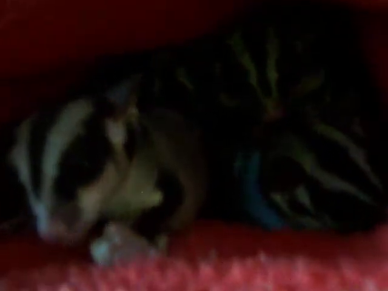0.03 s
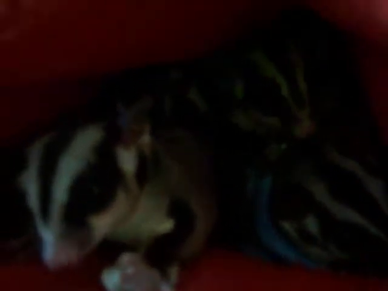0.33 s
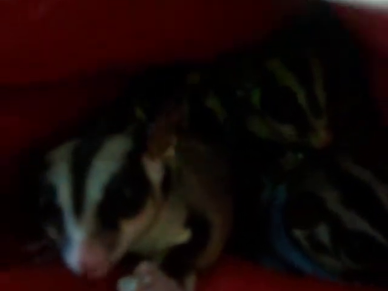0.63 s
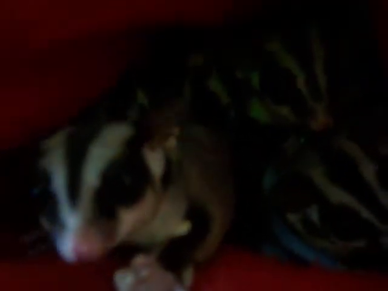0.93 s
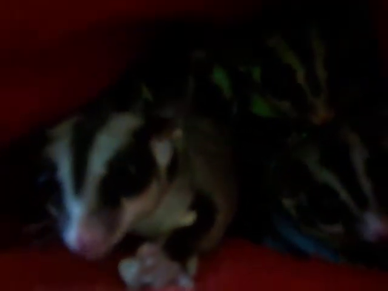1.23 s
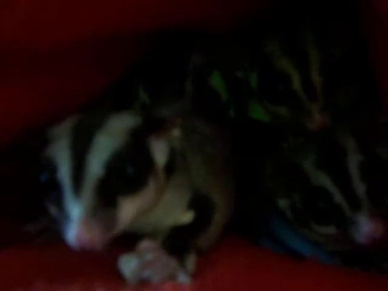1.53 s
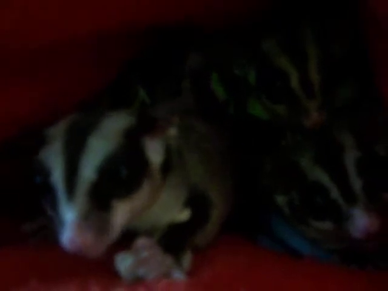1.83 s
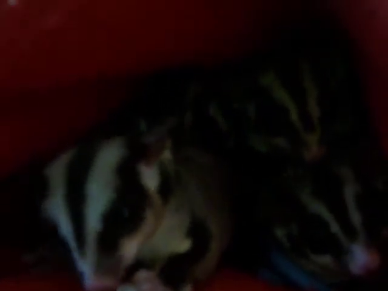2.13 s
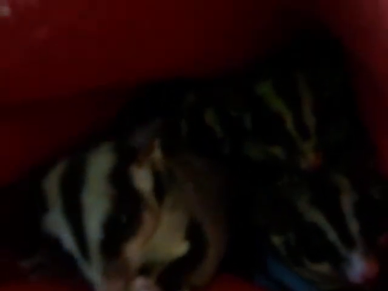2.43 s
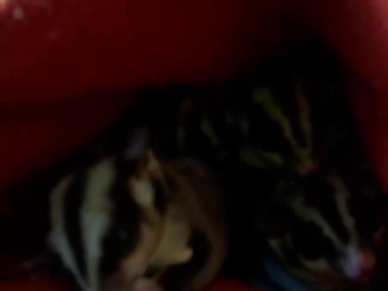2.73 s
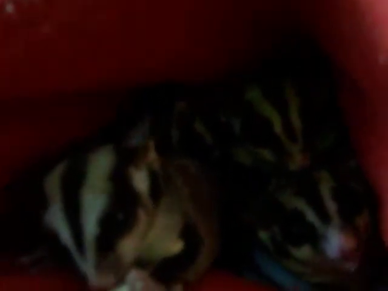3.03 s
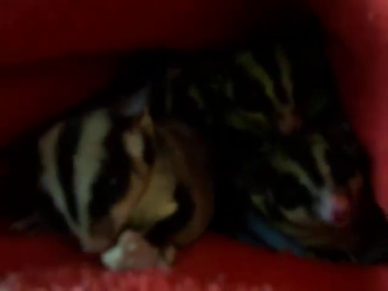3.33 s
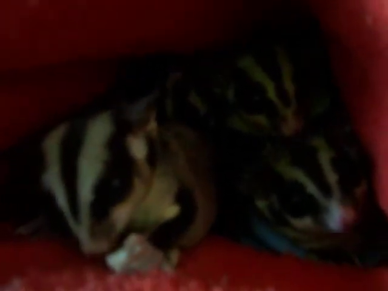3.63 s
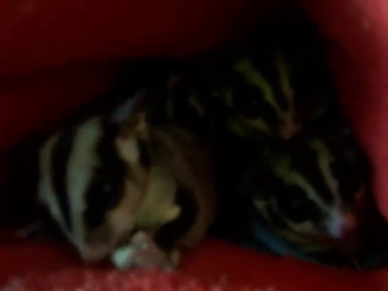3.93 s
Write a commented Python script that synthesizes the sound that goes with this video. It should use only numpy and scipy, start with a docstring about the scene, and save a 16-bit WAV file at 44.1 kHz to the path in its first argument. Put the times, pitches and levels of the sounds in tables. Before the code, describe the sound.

Small animals nibble treats quietly, close up in a cloth pouch. Four tiny crisp bites come in the first second, then others near 2.6, 3.3 and 3.7 seconds, with wet lip ticks scattered throughout. The cloth softly bumps the microphone around 0.4, 2.1, 3 and 3.9 seconds. Underneath run steady room hiss, a rapid low electronic flutter, a faint hum and a thin high whine.

```python
"""Small animals crunch treats in a cloth pouch, close to a camera: a few crisp bites, many wet lip ticks.
Each bite is a cluster of snaps, heard dry and ringing through the mouth; each tick is one ringing snap.
Now and then the cloth nudges the camera with a soft bump. Underneath sit the camera's electronics,
a low flutter at its frame rate and a thin whine with faint hum, on a bed of steady room hiss."""
import sys
import numpy as np
from scipy import signal
from scipy.fft import rfft, irfft, next_fast_len
from scipy.io import wavfile

SR = 44100
rng = np.random.default_rng(int(sys.argv[2]) if len(sys.argv) > 2 else 0)


def materialize(psi):
    """Save the field psi as 16-bit PCM at rate SR to the path in sys.argv[1].

    A 1-D psi becomes a single channel; in a 2-D psi each row is a channel.
    """
    bounded = np.clip(np.atleast_2d(psi).T, -1, 1)
    quanta = np.round(bounded * 32767).astype(np.int16)
    wavfile.write(sys.argv[1], SR, quanta)


N = 176400

# Treats cracking. Each row: main snap time, crackle span before it and after it, all in seconds,
# dry crack level in dB, then four mouth resonances, each as pitch in Hz and level in dB.
TREAT_BITES = [ (0.1261, 0.0011, .0045, -52, 2070, -47, 3340, -45.5, 6100, -46, 7930, -43),
               (0.1971, 0.00085, 0.0011, -47, 2370, -43, 3600, -60, 6400, -54, 7800, -51),
               (0.4213, 0.00058, 0.0029, -48.5, 2950, -45, 3800, -47, 4660, -46.5, 5900, -52),
               (.9536, .0005, 0.0018, -44.5, 1760, -46, 3930, -49.5, 5800, -51, 7240, -48.5),
               (2.6349, 0.00012, 0.00057, -48, 1860, -48, 3520, -49.5, 5800, -48, 6900, -51),
               (3.2967, 0.0007, 0.003, -52.5, 2110, -46.5, 3700, -46, 5350, -45, 5940, -47.5),
               (3.7489, 0.0029, 0.0013, -58, 2920, -49, 4150, -49.5, 5500, -45.5, 6060, -50)]
# Lip and tongue ticks. Each row: start in seconds, level in dB, pitch in Hz, nominal ring in seconds.
LIP_TICKS = [ (.035, -75, 5000, .003), (0.053, -52, 4800, 0.0014), (0.418, -52, 7900, 0.0023),
             (0.685, -57, 2800, .004), (.690, -60, 5200, .003), (.994, -50.5, 4600, 0.0013),
             (1.092, -49, 7600, 0.002), (1.183, -55, 2500, 0.0029), (1.251, -55.5, 5000, 0.0031),
             (1.308, -52, 600, 0.0076), (1.460, -48, 790, 0.0047), (1.712, -51, 2350, 0.0043),
             (1.879, -53, 6540, 0.00083), (2.1352, -49.5, 7400, 0.0017), (2.1773, -48.5, 7850, 0.0041),
             (2.383, -63, 3300, 0.0045), (2.651, -58, 5000, .003), (2.925, -53, 950, 0.0053),
             (3.307, -57, 5200, .003), (3.404, -60, 5500, .003), (3.5305, -51, 7200, 0.0013),
             (3.723, -54, 5200, 0.0034), (3.890, -51.5, 5700, 0.0027)]
# The pouch bumping the camera. Each row: time in seconds, peak level in dB.
POUCH_BUMPS = [(0.413, -36.5), (2.112, -32.5), (3.010, -33), (3.945, -38)]
# Fader ride on the flutter's low pulses. Each row: time in seconds, gain in dB.
FLUTTER_RIDE = [(0, 1.5), (.3, 1), (.42, 7), (.53, -4.5), (.67, 2.5), (.95, 1), (1.3, 2), (1.45, 1),
                (1.58, -0.5), (1.7, -0.5), (1.92, 2), (2.1, 1.5), (2.22, -1.5), (2.42, 1.5), (2.52, 2.5),
                (2.82, -1), (3.03, 1.5), (3.3, -0.5), (3.7, -1), (3.95, 4.5)]
# Mains hum and weak electronic tones. Each row: pitch in Hz, level in dB.
FAINT_TONES = [(120, -60), (180, -64), (240, -65.5), (1992.8, -79), (6543, -86)]
# Tone of the room and microphone hiss. Each row: frequency in Hz, relative level in dB.
HISS_EQ = [(20, 3), (60, 3.5), (130, 3.5), (220, -3), (300, -4), (450, -6.5), (800, -12), (1400, -16),
           (2100, -18), (3200, -19.5), (5500, -20.5), (7500, -21)]
# The camera's treble roll-off. Each row: frequency in Hz, gain in dB.
CAMERA_EQ = [(7300, -1), (7800, -6.5), (8400, -15), (8750, -25.5), (9050, -32)]


def bites(after_snaps=4, crackle_gain=0.53, low_cut_hz=910, mouth_width_hz=866):
    """A treat cracks: one main snap amid smaller ones, heard dry and through the mouth's resonances."""
    out = np.zeros(N)
    for at, before, after, crack_db, *mouth in TREAT_BITES:
        trailing = before + after * (np.arange(after_snaps) + rng.random(after_snaps)) / after_snaps
        offsets = np.r_[0, before, trailing]
        sizes = crackle_gain * rng.uniform(0.92, 1.3, len(offsets)) * rng.choice([-1, 1], len(offsets))
        sizes[1] = 1  # the main snap
        one_snap = snap()
        impulses = np.bincount((offsets * SR).astype(int), sizes, len(one_snap))
        crunch = signal.fftconvolve(impulses, one_snap)
        crack = level_click(filtered(crunch, lambda f: 1j * f / (low_cut_hz + 1j * f)))
        add(out, at - before, amp(crack_db) * crack)
        for hz, db in zip(mouth[::2], mouth[1::2]):
            add(out, at - before, -amp(db) * mouth_ring(crunch, hz, mouth_width_hz))
    return out


def lip_ticks(nibbles=30, nibble_db=(-64.5, -59), nibble_hz=4260, nibble_ring_s=0.002):
    """Lips and tongue make single wet ticks, with fainter chewing scattered between them."""
    out = np.zeros(N)
    chewing = [(rng.uniform(0, N / SR), rng.uniform(*nibble_db),
                nibble_hz * np.exp(0.39 * rng.normal()), nibble_ring_s) for _ in range(nibbles)]
    for start, db, hz, ring_s in LIP_TICKS + chewing:
        width_hz = 2 * np.log(1000) / (np.pi * ring_s)
        add(out, start, amp(db) * mouth_ring(snap(), hz, width_hz))
    return out


def mouth_ring(x, hz, width_hz):
    """The mouth rings at one pitch: two band-passes in series, each width_hz wide, then levelled."""
    return level_click(filtered(x, lambda f: (1j * f * width_hz / (hz**2 - f**2 + 1j * f * width_hz))**2))


def snap(samples=1764, pouch_db=-11, t60_s=0.036, rise_s=0.0025):
    """One sharp snap, followed by the pouch's short diffuse tail."""
    t = np.arange(samples) / SR
    tail = rng.standard_normal(samples) * amp(-60 * t / t60_s) * (1 - np.exp(-t / rise_s))
    return (t == 0) + amp(pouch_db) * tail / np.linalg.norm(tail)


def pouch_bumps(half_width_s=0.0025):
    """The cloth nudges the camera: one soft, low push each time."""
    t = np.arange(N) / SR
    return sum(amp(db) * np.exp(-0.5 * ((t - at) / half_width_s) ** 2) for at, db in POUCH_BUMPS)


def camera_flutter(frame_hz=30.014):
    """Each camera frame leaks into the sound as a short blip and a soft low pulse."""
    t = np.arange(N) / SR
    ride_db = np.interp(t, *np.transpose(FLUTTER_RIDE))
    return amp(-39) * frame_blips(t, frame_hz) + amp(-36 + ride_db) * frame_pulses(frame_hz)


def frame_blips(t, frame_hz, delay_s=0.0096, half_width_s=0.00091):
    """The flutter's buzzy edge: one triangular blip a frame, slightly uneven in size."""
    sizes = 1 + 0.13 * rng.standard_normal(int(N / SR * frame_hz) + 1)
    triangles = np.maximum(0, 1 - np.abs(t % (1 / frame_hz) - delay_s) / half_width_s)
    blips = -sizes[(t * frame_hz).astype(int)] * triangles
    return blips - blips.mean()


def frame_pulses(frame_hz, delay_s=0.0275, jitter_s=0.0028, typical_s=0.008, sag_s=0.033):
    """The flutter's low body: one sagging pulse a frame, uneven in depth and length."""
    pulses = np.zeros(N)
    for k, frame_start in enumerate(np.arange(0, N / SR, 1 / frame_hz)):
        age = np.arange(0, typical_s * np.exp(0.29 * rng.normal()), 1 / SR)
        depth = (1.4 if k % 3 == 1 else 1) + rng.uniform(-0.67, 1)  # accent on every third pulse
        add(pulses, frame_start + delay_s + jitter_s * rng.normal(), -depth * np.exp(-age / sag_s))
    pulses -= pulses.mean()
    low_cut_hz, high_cut_hz = 22, 122
    return filtered(pulses, lambda f: 1j * f / (low_cut_hz + 1j * f) / (1 + 1j * f / high_cut_hz) ** 2)


def camera_whine(whine_hz=6903.3, whine_db=-63.5):
    """The electronics hold one thin tone, with faint mains hum and two much weaker tones."""
    t = np.arange(N) / SR
    tones = [(whine_hz, whine_db)] + FAINT_TONES
    return sum(np.sqrt(2) * amp(db) * np.sin(2 * np.pi * (hz * t + rng.random())) for hz, db in tones)


def room_hiss(rms_db=-49):
    """An even bed of room and microphone noise."""
    noise = filtered(rng.standard_normal(N), lambda hz: eq_gain(HISS_EQ, hz))
    return amp(rms_db) * noise / np.sqrt(np.mean(noise ** 2))


def amp(db):
    """Decibels to gain."""
    return 10 ** (np.asarray(db) / 20)


def eq_gain(points, hz):
    """Gain of an EQ curve drawn through (Hz, dB) points on a log frequency axis."""
    point_hz, db = np.transpose(points)
    return amp(np.interp(np.log(hz + 1), np.log(point_hz), db))


def filtered(x, response):
    """Pass x through a response given as a function of frequency."""
    padded = next_fast_len(len(x) + 8192)
    return irfft(rfft(x, padded) * response(np.fft.rfftfreq(padded, 1 / SR)), padded)[:len(x)]


def level_click(x):
    """Scale a click to the energy of 4 ms at rms 1."""
    return x * np.sqrt(0.004 * SR / (np.sum(x ** 2) + 1e-30))


def add(track, start_s, sound):
    """Mix a sound into the track at start_s."""
    part = track[max(0, round(start_s * SR)):][:len(sound)]
    part += sound[:len(part)]


def scene():
    """Eating and pouch bumps over the background bed, in mono."""
    bed = room_hiss() + camera_flutter() + camera_whine()
    return (bed + bites() + lip_ticks() + pouch_bumps())[None]


def record(dry, top_hz=9100):
    """The camera rolls off the treble and passes nothing above its band limit."""
    return np.array([filtered(x, lambda hz: eq_gain(CAMERA_EQ, hz) * (hz < top_hz)) for x in dry])


dry = scene()
out = record(dry)
materialize(out)
```